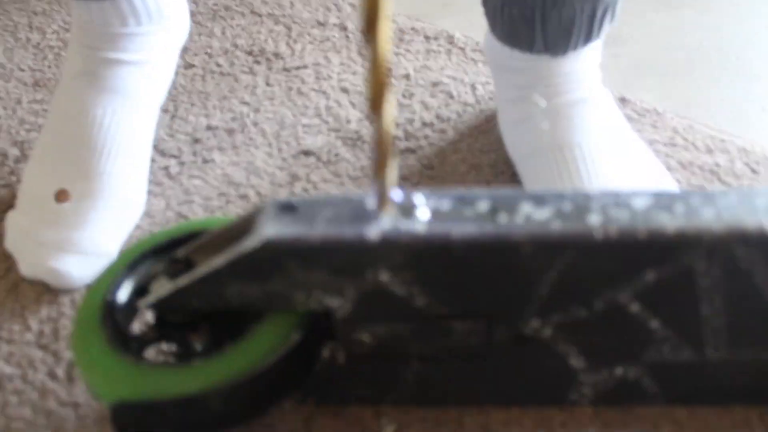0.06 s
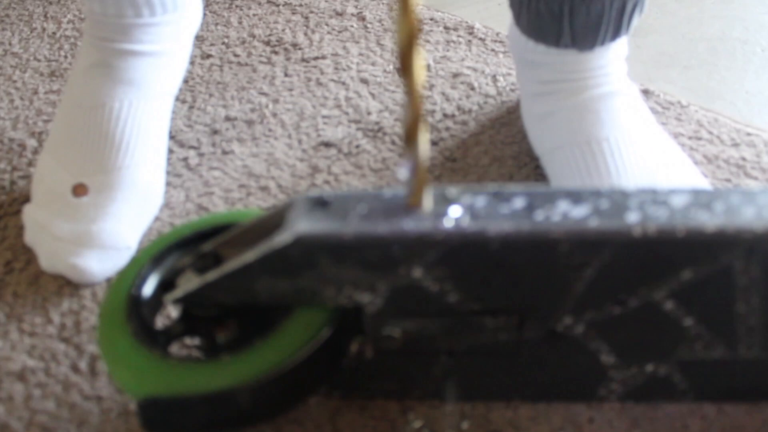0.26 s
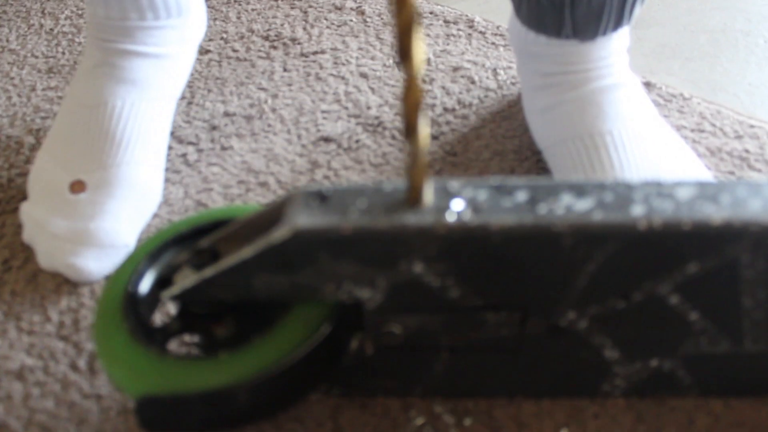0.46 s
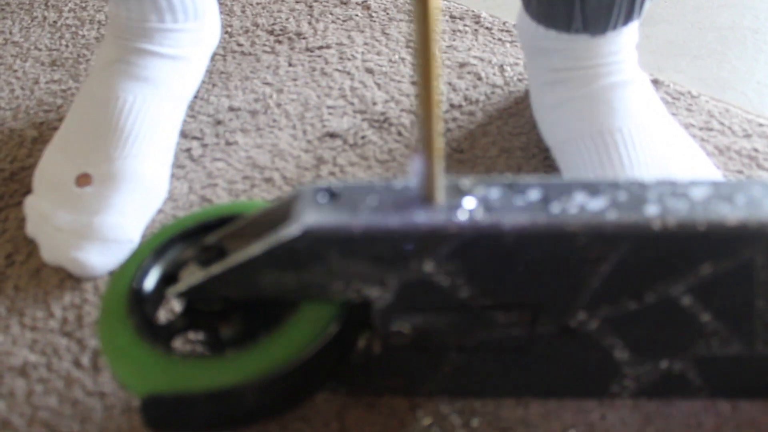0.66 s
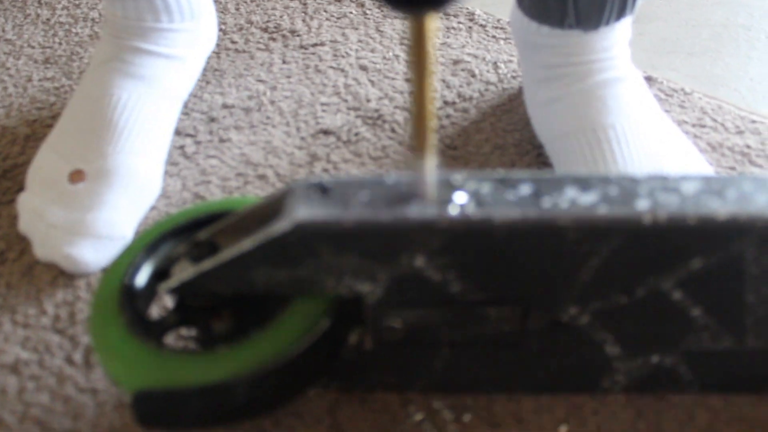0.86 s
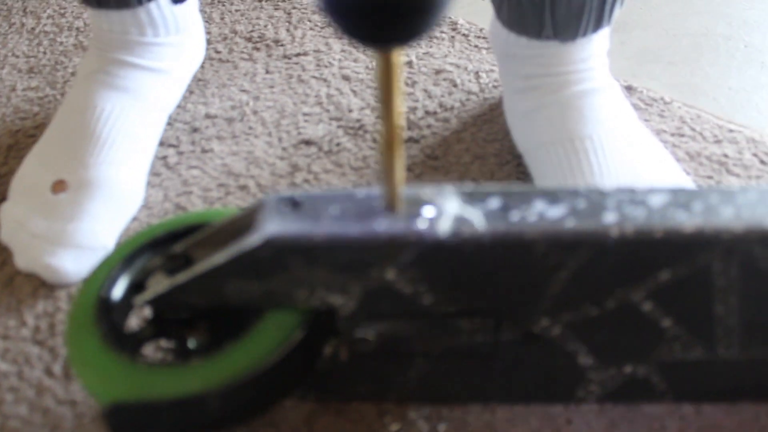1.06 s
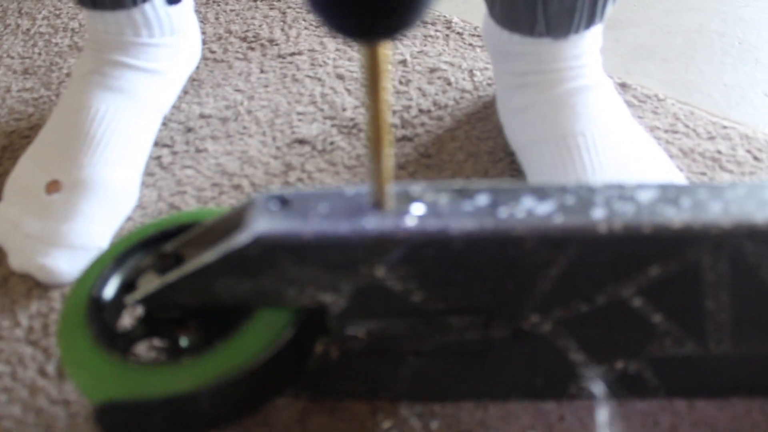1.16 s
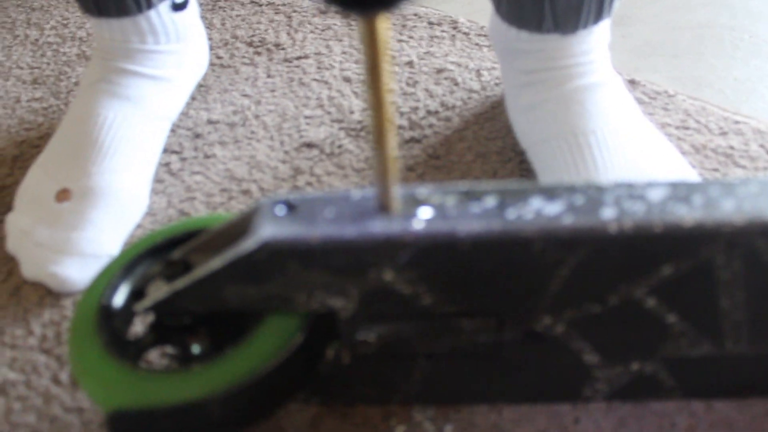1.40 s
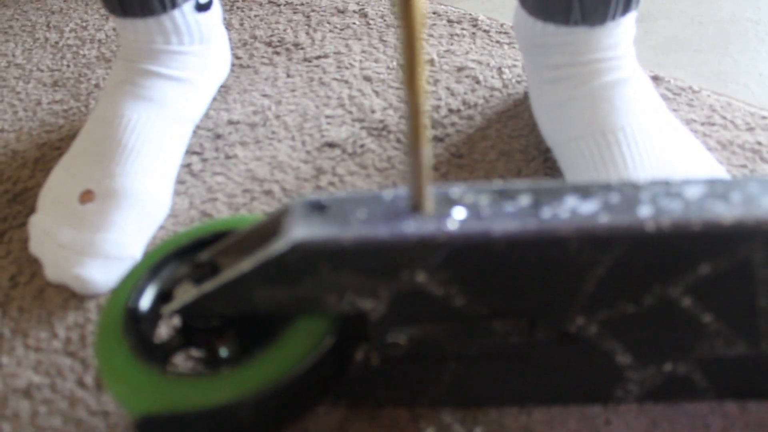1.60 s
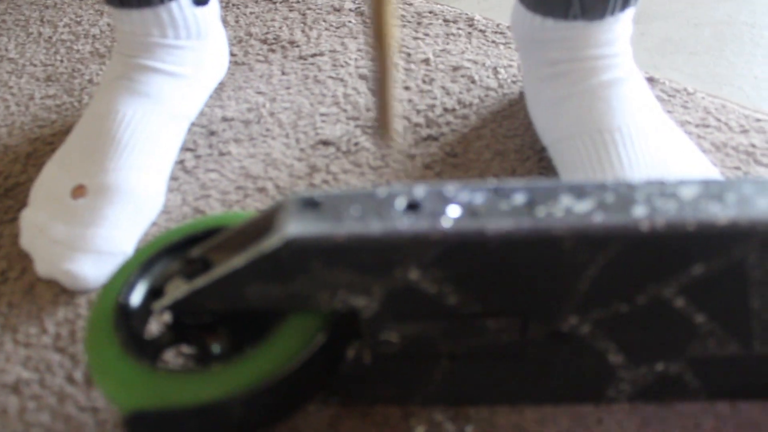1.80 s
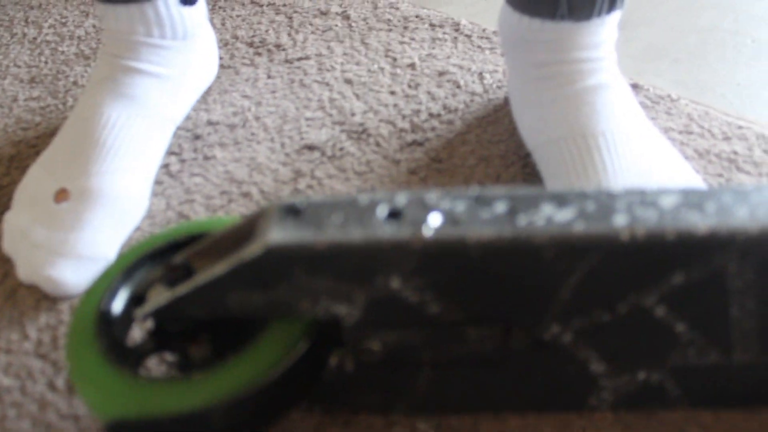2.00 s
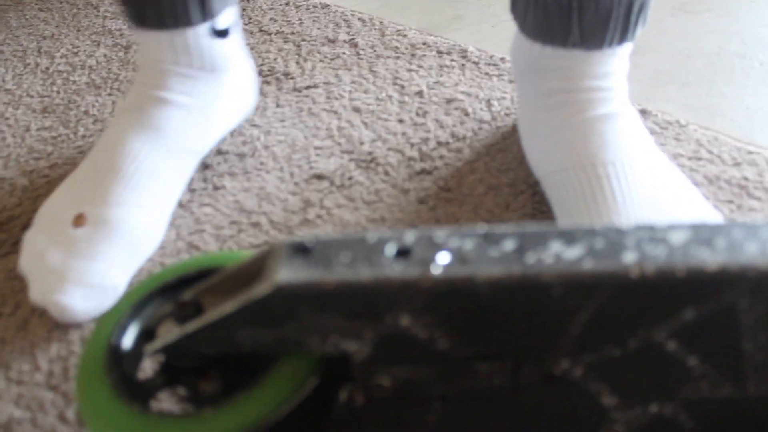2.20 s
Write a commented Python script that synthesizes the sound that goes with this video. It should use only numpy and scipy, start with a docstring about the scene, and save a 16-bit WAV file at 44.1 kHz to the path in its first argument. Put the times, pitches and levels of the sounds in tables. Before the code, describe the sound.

A cordless drill on a metal scooter deck, close, mono, in a small room. Bright hiss with thin whistles until 0.3 s, ending in a tick; the still bit scrapes and squeals at 0.35-0.5 s. A gritty motor whir rises and drops from 0.62-1.0 s, clicks, then rises again at 1.1 s and holds, knocking the deck, freer after 1.76 s. Clicks near 2 s, faint echo, late rustle.

```python
"""Cordless drill on a hollow metal deck

A drill works close to a mono microphone on a scooter deck that lies on carpet. A bright hiss with two thin
whistles comes first (coloured noise, wandering sines) and stops with a tick; the bit scrapes and squeals in
its hole. Two trigger pulls follow: sines tied to the shaft speed and gritty gear noise, while knocks ring
the deck. Trigger and chuck clicks are noise cracks; a late rustle, low rumble, echo and room hush lie behind."""
import sys
import numpy as np
from scipy import signal
from scipy.fft import rfft, irfft, next_fast_len
from scipy.io import wavfile
from scipy.ndimage import map_coordinates

SR = 44100
rng = np.random.default_rng(int(sys.argv[2]) if len(sys.argv) > 2 else 0)


def linear_from_db(decibels):
    """Turn decibels (scalar or array-like) into linear amplitude factors; 0 gives 1."""
    return 10 ** (np.asarray(decibels, float) / 20)


def master_out(mix):
    """Clip the mix to full scale and print it as 16-bit PCM to the path in sys.argv[1]."""
    frames = np.transpose(np.atleast_2d(mix))
    ceiling = np.clip(frames, -1, 1)
    pcm = np.round(ceiling * 32767).astype(np.int16)
    wavfile.write(sys.argv[1], SR, pcm)


N = 99225
T = np.arange(N) / SR  # time [s]

# Motor shaft, one list per trigger pull: (time [s], speed [Hz])
SHAFT_SPEED = [
    [(.625, 90), (.74, 204.3), (.772, 253.5), (.795, 271), (.824, 275.5), (.872, 287.4), (.948, 243),
     (.976, 202), (1.015, 142)],
    [(1.085, 71.8), (1.17, 205.4), (1.19, 247.2), (1.234, 282), (1.27, 292), (1.36, 302.5), (1.43, 303.5),
     (1.9, 305), (1.936, 289.4), (1.978, 273), (2.025, 201)],
]
# Motor noise, one list per trigger pull: (time [s], gear rush [dB], treble [dB])
PULL_LEVELS = [
    [(.62, -55, -74), (.65, -27, -50), (.672, -17, -49), (.71, -17, -32), (.745, -15, -18.5),
     (.8, -17.5, -23.5), (.87, -24.5, -31), (.93, -25, -30.5), (.972, -18.5, -33), (.995, -35, -57),
     (1.02, -38.5, -58)],
    [(1.08, -38, -54), (1.12, -25.5, -52), (1.16, -20.5, -29), (1.195, -14.5, -26), (1.23, -21, -30.5),
     (1.35, -24.5, -29.5), (1.42, -20, -26), (1.62, -27, -30.5), (1.7, -19, -27.5), (1.85, -22.5, -25.5),
     (1.93, -23, -24.5), (1.985, -20.5, -27), (2.005, -29.5, -66), (2.028, -45, -56)],
]
# Commutator whine: (time [s], level [dB])
WHINE_LEVEL = [(.71, -45), (.745, -26), (.82, -28), (.97, -33), (1.0, -60), (1.2, -36), (1.3, -31),
               (1.42, -26), (1.62, -29), (1.87, -26.5), (1.95, -33), (2.0, -48)]
# Gear rush colour: (frequency [Hz], relative level [dB])
RUSH_COLOUR = [(35, -65), (60, -49), (295, -18), (1280, -6.5), (1870, -4), (2350, -2.5), (9000, -8.5),
               (11700, -24), (19800, -120)]
# Fan noise colour: (frequency [Hz], relative level [dB])
FAN_COLOUR = [(6000, -26), (8000, 3.5), (9500, 0.5), (11500, -5), (12500, -11), (15800, -16.5)]
COMMUTATOR_BARS, GEAR_TEETH = 12, 31  # cycles per shaft turn
LIFT_S, LIFT_FADE_S = 1.76, 0.039  # the bit comes free of the deck; the deck hum has faded out by then

# Low deck resonances: (frequency [Hz], width [Hz], relative level [dB])
DECK_LOW_MODES = [(822, 111.5, -14.5), (1262, 67, -9.5), (1870, 44.6, 5), (2650, 173, -6)]
# High deck resonances: (frequency [Hz], width [Hz], relative level [dB])
DECK_HIGH_MODES = [(5400, 65, -5), (5710, 89.7, -1), (7975, 41.4, 0.5)]
# The bit knocks the wall of the hole: (time [s], low ring [dB], high ring [dB])
WALL_KNOCKS = [(0.6893, -4, -30), (0.7394, -25, -6), (0.7587, -15, -22), (0.7796, -17, -14),
               (0.8028, -12, -6.5), (0.841, -23, -9), (0.8938, -12.5, -20), (1.1728, -15, -5),
               (1.204, -2.5, -10), (1.2495, -13, -20), (1.277, -14, -22), (1.2997, -10.5, -9),
               (1.323, -12, -26), (1.339, -21, -14), (1.388, -11, -24), (1.4572, -6.5, -9),
               (1.503, -28, -10), (1.5525, -14, -6.5), (1.592, -21, -8.5), (1.633, -25, -9),
               (1.686, -15, -11.5), (1.72, -15, -16)]

# The still bit scrapes in the hole: (time [s], low band [dB], high band [dB])
SCRAPE_LEVELS = [(.332, -64, -78), (.348, -19.5, -24.5), (.365, -19.5, -21), (.385, -18, -19),
                 (.402, -23.5, -32.5), (.414, -41.5, -44), (.43, -33, -40), (.436, -31, -46),
                 (.442, -53, -75), (.456, -49, -49), (.468, -33.5, -32), (.479, -38, -38), (.49, -56, -61)]
# Colour of the low scrape: (frequency [Hz], relative level [dB])
SCRAPE_LOW_COLOUR = [(35, -47), (60, -33), (707, -11.5), (1290, -4.5), (1430, -10.5), (3600, -12),
                     (4680, -31), (7920, -120)]
# Colour of the high scrape: (frequency [Hz], relative level [dB])
SCRAPE_HIGH_COLOUR = [(1940, -59), (3300, -18.5), (4390, -9.5), (4900, -13), (10200, -20), (15500, -53)]
# Squeals of the bit, a bright tick as the hiss stops (0.31 s) and the short ring of a click (2.032 s):
# (start [s], length [s], pitch [Hz], level [dB])
SHORT_TONES = [(0.379, 0.0073, 4330, -10.5), (0.386, 0.01, 4288, -7), (0.31, 0.0059, 10100, -26),
               (0.364, 0.0021, 2860, -16), (0.374, .014, 1310, -19), (.467, 0.0091, 1910, -32),
               (0.752, 0.0053, 4480, -11), (2.032, .0012, 3780, -19.5)]
# Narrow singing of the long bit, faint in the pauses: (time [s], level [dB])
BIT_SINGING_LEVEL = [(.4, -46), (.62, -60), (.69, -29), (.97, -33), (1.0, -66), (2.04, -52), (2.15, -62)]

# Trigger and chuck clicks: (time [s], level [dB])
CLICK_HITS = [(0.0163, -30), (0.457, -17.5), (0.5637, -31.5), (0.607, -24.5), (1.0289, -13.5), (1.068, -25),
              (1.976, -9.5), (2.031, -16), (2.0393, -15.5)]
# Click colour: (frequency [Hz], relative level [dB])
CLICK_NOISE_COLOUR = [(120, -15), (1200, 1), (4000, 4), (10000, -6), (15500, -49)]

# Hiss: (time [s], level [dB])
HISS_LEVEL = [(0, -28), (.025, -28), (.26, -26.5), (.288, -27), (.3, -41), (.307, -30), (.315, -17),
              (.318, -61), (.33, -70)]
# Hiss colour: (frequency [Hz], relative level [dB])
HISS_NOISE_COLOUR = [(180, -46), (300, -28), (1490, -10.5), (2900, -19), (3790, -8), (5300, -5.5),
                     (9800, -0.5), (15200, -0.5), (16200, -1.5)]
# Wandering whistles, one list each: (time [s], pitch [Hz], level [dB])
WHISTLE_PATHS = [
    [(.025, 4000, -44), (.048, 4050, -46), (.06, 3750, -39), (.13, 4230, -41), (.172, 4030, -44),
     (.184, 3720, -38), (.255, 3670, -42)],
    [(.2, 1800, -50), (.26, 1540, -43.5), (.285, 1460, -40), (.3, 1460, -54)],
    [(.608, 5900, -44), (.618, 6050, -43), (.632, 5250, -44), (.65, 5460, -42)],
]
# Resonant bands of the rustle: (frequency [Hz], width [Hz], relative level [dB])
RUSTLE_BANDS = [(2900, 560, -7), (3700, 150, 4)]

# Low rumble of handling: (time [s], level [dB])
RUMBLE_LEVEL = [(.33, -56), (.4, -54.5), (.6, -55), (.7, -45.5), (.95, -64.5), (1.15, -48.5), (1.3, -65),
                (2.25, -56.5)]
# Rumble colour: (frequency [Hz], relative level [dB])
RUMBLE_NOISE_COLOUR = [(40, -21), (90, 4.5), (220, 1), (400, -32)]
# Room hush colour: (frequency [Hz], relative level [dB])
ROOM_COLOUR = [(20, -24), (70, -6), (191, -14.5), (400, -9), (1980, -10), (3170, -9.5), (8880, -18),
               (15500, -46)]


def unit(x):
    """Scales a sound to rms 1."""
    return x / np.sqrt(np.mean(x ** 2) + 1e-20)


def curve(rows, column, off=-120):
    """Draws one table column over time, at the off value outside it."""
    rows = np.array(rows, float)
    return np.interp(T, rows[:, 0], rows[:, column], off, off)


def wobble(rate):
    """Smooth random curve with this many knots a second."""
    knots = rng.standard_normal(int(N * 400 / SR) + 4)  # enough for rates up to 400
    return map_coordinates(knots, [T * rate])


def filtered(x, response):
    """Multiplies the spectrum of x by a response of frequency."""
    size = next_fast_len(N + 8192)
    return irfft(rfft(x, size) * response(np.fft.rfftfreq(size, 1 / SR)), size)[:N]


def colour(points):
    """Filter gain drawn through (Hz, dB) points on a log frequency axis."""
    f, db = np.transpose(points)
    return lambda hz: linear_from_db(np.interp(np.log(hz + 1), np.log(f + 1), db))


def noise(points):
    """Smooth coloured noise of rms 1."""
    return unit(filtered(rng.standard_normal(N), colour(points)))


def gritty(points):
    """Coloured noise of rms 1 with sharp grains of scattered size in it."""
    chance, size = rng.random((2, N))
    hit = chance < 3400 / SR  # 3400 grains a second on average
    grains = hit * linear_from_db(23.1 * size) * rng.choice([-1, 1], N)
    return unit(filtered(rng.standard_normal(N) + linear_from_db(-14) * unit(grains), colour(points)))


def rings(modes):
    """Response of causal resonances summed with alternating sign."""
    def response(f):
        total = 0
        for k, (centre, width, db) in enumerate(modes):
            damping = 1j * f * width
            total = total + (-1) ** k * linear_from_db(db) * damping / (centre ** 2 - f ** 2 + damping)
        return total
    return response


def burst(start, db, rise_s, t60):
    """Envelope of one blow: a fast rise, then a decay of 60 dB in t60 seconds."""
    t = np.maximum(T - start, 0)
    return (1 - np.exp(-t / rise_s)) * linear_from_db(db - 60 * t / t60)


def tone(hz, waver_hz):
    """Sine of rms 1 on a pitch curve that wavers at random."""
    return np.sqrt(2) * np.sin(2 * np.pi * np.cumsum(hz + waver_hz * wobble(200)) / SR)


def shaft_hum(shaft, rush_db):
    """Hum at the shaft speed; it grows 2.5 dB per dB of speed and fades under a weak rush."""
    spin_db = 20 * np.log10(shaft / np.max(SHAFT_SPEED[-1]) + 1e-6)
    fade_db = np.minimum(rush_db + 26, 0)  # starts where the rush falls below -26 dB
    return linear_from_db(-39 + 2.5 * spin_db + fade_db + wobble(20)) * tone(shaft, waver_hz=1.5)


def commutator_whine(shaft):
    """Unsteady whine at one cycle per commutator bar."""
    level = linear_from_db(curve(WHINE_LEVEL, column=1) + 3 * wobble(150)) * (shaft > 0)
    return level * tone(COMMUTATOR_BARS * shaft, waver_hz=22)


def gear_mesh(shaft, treble_db):
    """Wavering tone at the tooth rate, pulsing with each shaft turn; 12 dB lower until the bit lifts."""
    level = linear_from_db(treble_db - 7 - 12 * (T < LIFT_S) + 3 * wobble(100))
    pulse = 1 + tone(shaft, waver_hz=20)
    return level * pulse * tone(GEAR_TEETH * shaft, waver_hz=130)


def deck_hum(rush):
    """Grit through the deck's resonances follows the gear rush until the bit comes free."""
    contact = np.clip((LIFT_S - T) / LIFT_FADE_S, 0, 1)
    out = np.zeros(N)
    for modes, db in (DECK_LOW_MODES, -8.5), (DECK_HIGH_MODES, -24):
        ring = unit(filtered(gritty([(100, 0)]), rings(modes)))
        out += linear_from_db(db + 2.8 * wobble(70)) * contact * rush * ring
    return out


def motor():
    """Each trigger pull sums hum, whine, gear mesh, gritty gear rush, fan noise and the deck's hum."""
    out = np.zeros(N)
    for speed, pull in zip(SHAFT_SPEED, PULL_LEVELS):
        shaft = curve(speed, column=1, off=0)
        rush_db, treble_db = curve(pull, column=1), curve(pull, column=2)
        out += shaft_hum(shaft, rush_db) + commutator_whine(shaft) + gear_mesh(shaft, treble_db)
        rush = linear_from_db(rush_db + 2.47 * wobble(25.78) + 0.21 * wobble(90))
        out += linear_from_db(0.5) * rush * gritty(RUSH_COLOUR)
        out += linear_from_db(treble_db + 1.8 * wobble(40.63)) * gritty(FAN_COLOUR)
        out += deck_hum(rush)
    return out


def knocks():
    """Each knock is a short rattle of grit and deck modes, every mode at an unsteady level."""
    out = np.zeros(N)
    for column, modes in enumerate([DECK_LOW_MODES, DECK_HIGH_MODES], start=1):
        push = sum(burst(k[0], k[column], rise_s=0.0024, t60=0.036) for k in WALL_KNOCKS)
        ring = sum(linear_from_db(db + 4 * wobble(60)) * tone(hz, width) for hz, width, db in modes)
        out += push * (unit(ring) + linear_from_db(-3) * gritty(RUSH_COLOUR))
    return out


def scrape():
    """Rubbing of the still bit: a low and a high band of gritty noise."""
    low = linear_from_db(curve(SCRAPE_LEVELS, column=1)) * gritty(SCRAPE_LOW_COLOUR)
    high = linear_from_db(curve(SCRAPE_LEVELS, column=2)) * gritty(SCRAPE_HIGH_COLOUR)
    return low + high


def squeals_tick_and_ring():
    """Bit squeals, the tick and the click's ring: unsteady sines, sharp at the start, quick to die away."""
    out = np.zeros(N)
    for start, length, hz, db in SHORT_TONES:
        attack = np.clip((T - start) / 0.00014, 0, 1)
        release = linear_from_db(-60 * np.maximum(T - start - length, 0) / 0.008)  # 60 dB in 8 ms
        out += attack * release * linear_from_db(db + 1.2 * wobble(270)) * tone(hz, waver_hz=54)
    return out


def bit_singing():
    """The long bit sings at one narrow pitch, a sine wavering around 4330 Hz."""
    return linear_from_db(curve(BIT_SINGING_LEVEL, column=1) + 2.3 * wobble(61.3)) * tone(4330, waver_hz=70)


def clicks():
    """Trigger and chuck clicks are short cracks of coloured noise."""
    hits = sum(burst(s, db, rise_s=0.00064, t60=0.018) for s, db in CLICK_HITS)
    return hits * noise(CLICK_NOISE_COLOUR)


def hiss():
    """Bright smooth noise with a gently unsteady level."""
    return linear_from_db(curve(HISS_LEVEL, column=1) + 1.44 * wobble(55.0)) * noise(HISS_NOISE_COLOUR)


def whistles():
    """Two wandering sines in the hiss and a squeak as the trigger is pulled, each with a weaker octave."""
    out = np.zeros(N)
    for path in WHISTLE_PATHS:
        pitch = curve(path, column=1, off=0)
        for harmonic, drop_db in (1, 0), (2, 8.2):
            level = linear_from_db(curve(path, column=2) - drop_db + 3.4 * wobble(77))
            out += level * tone(harmonic * pitch, waver_hz=89)
    return out


def rustle():
    """Noise through two resonant bands swells by 130 dB a second to -46.5 dB at the very end."""
    band = unit(filtered(rng.standard_normal(N), rings(RUSTLE_BANDS)))
    return linear_from_db(-46.5 + 130 * (T - T[-1])) * band


def handling_rumble():
    """Low coloured noise with a restless level."""
    return linear_from_db(curve(RUMBLE_LEVEL, column=1) + 5.9 * wobble(20.33)) * noise(RUMBLE_NOISE_COLOUR)


def echo(dry):
    """Room echo: the sound convolved with a decaying noise tail that starts after 15 ms."""
    length = SR // 3
    tail = rng.standard_normal(length) * burst(0.0154, 0, rise_s=0.0023, t60=0.59)[:length]
    return linear_from_db(-25.5) * signal.fftconvolve(dry, tail / np.linalg.norm(tail))[:N]


def room_hush():
    """Faint coloured noise of the room, its level drifting slowly."""
    return linear_from_db(-49.5 + wobble(10.15)) * noise(ROOM_COLOUR)


def scene():
    """Sums all sources, adds echo and hush, and feeds the same sound to both channels."""
    drill = motor() + knocks() + scrape() + squeals_tick_and_ring() + bit_singing() + clicks()
    dry = drill + hiss() + whistles() + rustle() + handling_rumble()
    mono = dry + echo(dry) + room_hush()
    return np.array([mono, mono])


def band_limit(x):
    """A steep low-pass at the top of the band."""
    return signal.sosfilt(signal.butter(12, 16360, fs=SR, output="sos"), x)


def record(dry):
    """Steep treble cut at 15.7 kHz, then a hard ceiling at full scale."""
    kept = filtered(dry[0], lambda hz: 1 / (1 + (hz / 15700) ** 80))
    mix = np.clip(np.array([kept, kept]), -1, 1)
    return band_limit(mix)


dry = scene()
out = record(dry)
master_out(out)
```